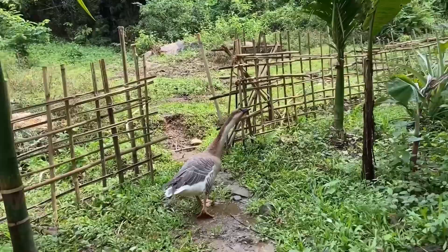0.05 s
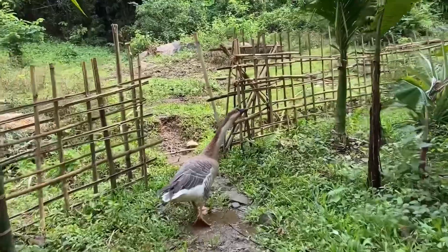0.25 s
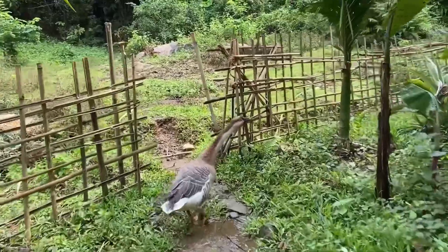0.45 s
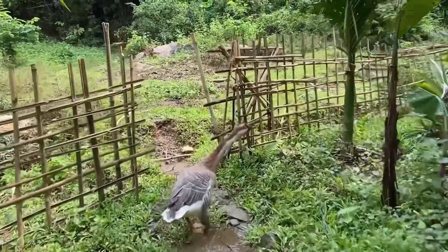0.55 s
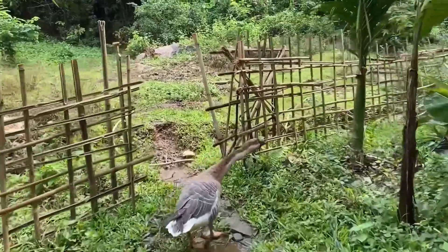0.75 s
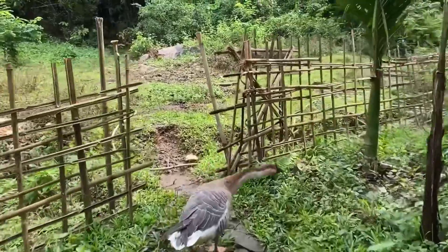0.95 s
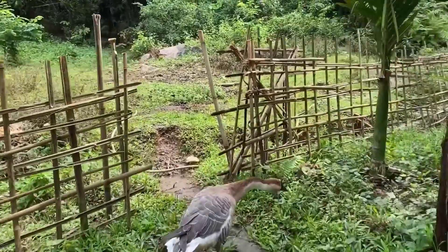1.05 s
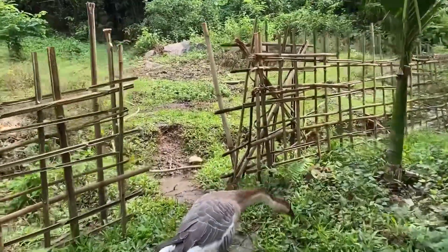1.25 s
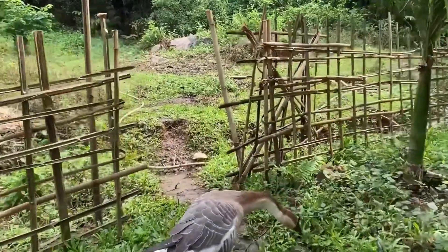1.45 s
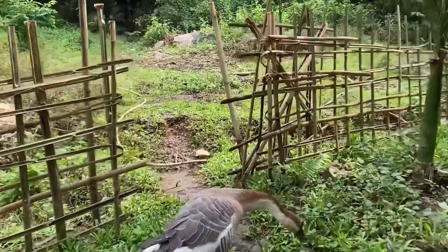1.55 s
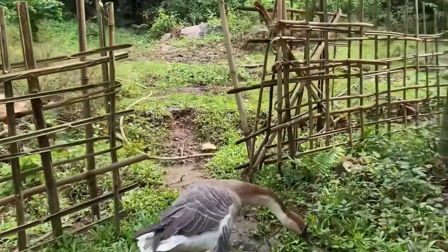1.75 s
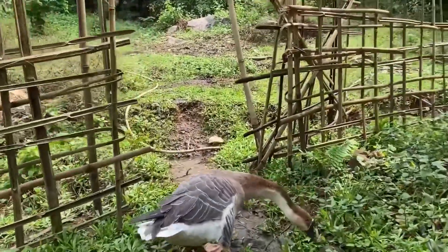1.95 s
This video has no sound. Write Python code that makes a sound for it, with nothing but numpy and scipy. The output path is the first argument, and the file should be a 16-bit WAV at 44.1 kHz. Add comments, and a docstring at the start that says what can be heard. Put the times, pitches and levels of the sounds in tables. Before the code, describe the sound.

On a garden path, a goose hisses once a little right of the microphone, growing louder and wheezing before cutting off with a tiny squeak. Light grass rustles follow against a low, quiet outdoor background.

```python
"""A goose gives one long hiss on a garden path, a few steps away and a little to the right.
Turbulent air excites the resonances of its throat, which rise as the neck stretches and now and
then catch as wheezy whistles; the upper resonances shift as the bill opens.
The hiss shuts off with a small falling squeak. Then grass rustles, once clearly and otherwise
faintly, over a quiet outdoor rumble."""
import sys
import numpy as np
from scipy import signal
from scipy.fft import rfft, irfft
from scipy.io import wavfile
from scipy.ndimage import uniform_filter1d

SR = 44100
rng = np.random.default_rng(int(sys.argv[2]) if len(sys.argv) > 2 else 0)


def unload_audio(sound):
    """Save the sound as a 16-bit wav file, at the path given as the first command line argument."""
    columns = np.transpose(np.atleast_2d(sound))
    # keep every value between -1 and 1, then stretch to whole-number steps
    steps = np.round(np.clip(columns, -1, 1) * 32767)
    wavfile.write(sys.argv[1], SR, steps.astype(np.int16))


N = 88200
T, HZ = np.arange(N) / SR, np.fft.rfftfreq(N, 1 / SR)
FLUTTER_HZ, WAVER_DEPTH_HZ, WAVER_RATE_HZ = 70, 8.16, 54  # unsteadiness of level and of pitch

# Breath through the throat resonances. Each row: time in seconds, level in dB.
THROAT_LEVEL = [(0, -49.5), (.1, -44.5), (.19, -36.5), (.3, -32), (.42, -33), (.52, -29), (.66, -29),
                (.85, -28), (.95, -21.5), (1.13, -23), (1.203, -26), (1.222, -30.5), (1.238, -27),
                (1.254, -52), (1.3, -52)]
# Breath through the upper resonances. Each row: time in seconds, level in dB.
BILL_LEVEL = [(0, -67), (.17, -50), (.24, -41.5), (.45, -38.5), (.6, -34), (.72, -32), (.88, -27.5),
              (1.03, -31.5), (1.2, -30.5), (1.222, -38), (1.245, -46), (1.26, -71), (1.3, -74)]
def goose():
    """Amplitude modulation: the hiss flutters with the airflow until the throat shuts."""
    breath = amp(curve(THROAT_LEVEL)) * throat() + amp(curve(BILL_LEVEL)) * bill() + air()
    flowing = T < THROAT_LEVEL[-1][0]
    flutter = amp(0.48 * wander(FLUTTER_HZ))
    return flowing * breath * flutter + whistles() + squeak()


# Stretch of the throat. Each row: time in seconds, frequency ratio.
STRETCH = [(0, .995), (.4, 1.004), (.6, 1.022), (.8, 1.014), (1.0, 1.11), (1.15, 1.208), (1.25, 1.12)]
# Throat resonances. Each row: rest frequency in Hz, nominal width in Hz, exponent of the stretch,
# relative level in dB at rest, the same when stretched.
THROAT_MODES = [(831, 77, 1.2, -7.5, -13.5), (1046.5, 124, .85, -2.5, 1.5), (1257, 108, .72, -4, 0.5),
                (1574, 92, 1.0, -0.5, -13), (1418, 150, 0.053, -1, -30), (519.8, 73, 0.63, -21.5, -28)]
def throat():
    """Source and filter: turbulence excites resonances that rise and trade strength with stretch."""
    stretch = curve(STRETCH)
    stretched = np.clip((stretch - 1) / 0.071, 0, 1)  # the balance stops changing at 7.1 % stretch
    out, power = 0, 0
    for hz, width, exponent, rest_db, stretched_db in THROAT_MODES:
        gain = amp(rest_db + (stretched_db - rest_db) * stretched)
        out += gain * band(hz * stretch ** exponent, width)
        power += gain ** 2
    return out / np.sqrt(power)


# Upper resonances. Each row: frequency in Hz with the bill nearly shut, the same wide open,
# nominal width in Hz, relative level in dB nearly shut, the same wide open.
BILL_MODES = [(1760, 2260, 184, 3.5, -1), (2200, 2600, 440, -4, -3), (2247, 3440, 165, -1, 4.5),
              (3170, 3650, 205, -0.5, -1), (3303, 4300, 270, 1.5, -13), (4020, 5750, 240, -15.5, -23),
              (4750, 4100, 220, -13, -42), (5550, 7100, 460, -17.5, -30)]
def bill(start_s=.2, opening_s=1.02):
    """Formant shift: opening the bill retunes the upper resonances, nearly all of them upward."""
    opened = np.clip((T - start_s) / opening_s, 0, 1) ** 1.45
    out, power = 0, 0
    for shut_hz, open_hz, width, shut_db, open_db in BILL_MODES:
        gain = amp(shut_db + (open_db - shut_db) * opened)
        out += gain * band(shut_hz + (open_hz - shut_hz) * opened, width)
        power += gain ** 2
    return out / np.sqrt(power)


# Spectrum of the air at the bill. Each row: frequency in Hz, relative density in dB.
AIR_SPECTRUM = [(300, -38), (700, -19), (1100, -12), (2000, 5.5), (3700, 2.5), (4400, -3), (5200, -3),
                (6600, -6.5), (8200, -9.5), (11000, -17.5), (16000, -25)]
def air(start_s=.18, end_s=1.26, rise_s=0.045, fall_s=0.049, growth_db_per_s=1.5):
    """Turbulent flow: air rushing past the open bill makes broadband noise."""
    gate = np.clip((T - start_s) / rise_s, 0, 1) * np.clip((end_s - T) / fall_s, 0, 1)
    level = amp(-41 + growth_db_per_s * (T - start_s))
    rush = colour(rng.standard_normal(N), AIR_SPECTRUM)
    return gate * level * unit(patchy(rush, depth_db=2.5))


# Whistles in the throat. Each row: start in seconds, length in seconds, first frequency in Hz,
# last frequency in Hz, level in dB.
WHISTLES = [(-.12, 0.33, 1015, 1076, -37), (-.08, 0.237, 3090, 3180, -56.5),
            (-.08, 0.15, 1600, 1580, -47.5), (0.217, 0.14, 1241, 1256, -33),
            (0.286, 0.2, 1260, 1283, -25.5), (0.336, 0.271, 810.4, 838.6, -29),
            (0.352, 0.19, 1538, 1587, -30.5), (0.376, 0.07, 3170, 3215, -41.5),
            (0.466, .26, 1065, 1096, -34), (0.578, 0.182, 832, 858, -37), (0.599, 0.12, 3190, 3304, -37.5),
            (0.707, 0.21, 1290, 1320, -27), (0.718, 0.16, 2590, 2625, -37), (0.922, .13, 1365, 1425, -26.5),
            (0.985, 0.175, 1712, 1752, -31), (1.075, 0.18, 1158, 1182, -29.5),
            (1.165, 0.059, 1410, 1306, -20), (1.228, 0.016, 1330, 1285, -31)]
def whistles():
    """Flow-excited oscillation: the throat catches on wavering, near-pure tones that swell and fade."""
    out = np.zeros(N)
    for start, length, from_hz, to_hz, db in WHISTLES:
        progress = np.clip((T - start) / length, 0, 1)
        hz = from_hz + (to_hz - from_hz) * progress + WAVER_DEPTH_HZ * wander(WAVER_RATE_HZ)
        swell = (4 * progress * (1 - progress)) ** 0.61
        level = amp(db + 1.25 * wander(FLUTTER_HZ)) * swell
        out += np.sqrt(2) * level * np.sin(2 * np.pi * np.cumsum(hz) / SR)
    return out


# Squeak as the throat closes. Each row: time in seconds, frequency in Hz, level in dB.
SQUEAK = [(1.04, 575, -51.5), (1.14, 560.3, -61), (1.175, 566.5, -42), (1.208, 585.5, -40),
          (1.255, 398, -45.5), (1.275, 392, -72)]
def squeak(grunt_db=-8.5):
    """Harmonic vibration: the falling squeak is the third harmonic of a weak grunt."""
    hz = curve(SQUEAK) + WAVER_DEPTH_HZ * wander(WAVER_RATE_HZ)
    phase = 2 * np.pi * np.cumsum(hz) / SR
    tone = np.sin(phase) + amp(grunt_db) * np.sin(phase / 3)
    sounding = (T > SQUEAK[0][0]) & (T < SQUEAK[-1][0])
    return np.sqrt(2) * sounding * amp(curve(SQUEAK, column=2)) * tone


# Brushes through grass. Each row: peak time, rise and decay in seconds, level in dB,
# centre and nominal width in Hz, crackle relative to the noise band in dB.
RUSTLES = [(1.849, 0.027, 0.02, -35.5, 2300, 910, -6), (1.42, 0.063, 0.042, -47, 1600, 3400, -7),
           (1.332, .03, 0.017, -45, 670, 240, -17), (1.98, 0.11, 0.054, -47.5, 900, 2000, -7)]
# Spectrum of the crackle. Each row: frequency in Hz, relative density in dB.
CRACKLE_SPECTRUM = [(500, -10), (2000, -3.5), (4000, -2), (6000, -6.5), (9000, -7.5), (12500, -0.5),
                    (16000, -13.5)]
def rustles(grains_per_s=3000, spread_db=2.5):
    """Shot noise: grass blades catch abruptly, adding random impulses to a soft band of noise."""
    out = np.zeros(N)
    for peak, rise, decay, db, hz, width, crackle_db in RUSTLES:
        attack = np.clip(1 + (T - peak) / rise, 0, 1) ** .3
        envelope = np.where(T < peak, attack, np.exp(-abs(T - peak) / decay))
        impulses = (rng.random(N) < grains_per_s / SR) * rng.choice([-1, 1], N)
        strengths = amp(spread_db * np.minimum(rng.exponential(1, N), 4))
        crackle = unit(colour(impulses * strengths, CRACKLE_SPECTRUM))
        out += amp(db) * envelope * (band(hz, width) + amp(crackle_db) * crackle)
    return out


# Echoes from fence and plants. Each row: frequency in Hz, level relative to the direct sound in dB.
ECHO_SPECTRUM = [(500, -12.5), (1300, -12), (2500, -8.5), (4000, -5), (5600, -6), (6800, -13.5),
                 (16000, -35)]
def garden(x, t60_s=0.11, echoes_per_s=2000):
    """Scattering: fence and plants return short, sparse echoes, different at each ear."""
    t = T[:SR // 4]
    taps = rng.standard_normal((2, len(t))) * (rng.random((2, len(t))) < echoes_per_s / SR)
    taps *= amp(-60 * t / t60_s) * (t > .003)
    taps /= np.linalg.norm(taps, axis=1, keepdims=True)
    return x + signal.fftconvolve(colour(x, ECHO_SPECTRUM)[None], taps, axes=1)[:, :N]


# Outdoor rumble and distant wash. Each row: frequency in Hz, relative density in dB.
WASH_SPECTRUM = [(20, -21), (35, -13), (58, -2), (85, -6.5), (115, -11.5), (150, -15), (250, -13),
                 (340, -18), (480, -19), (700, -18.5), (1200, -22.5), (2000, -23.5), (3500, -28.5),
                 (5800, -34), (8000, -34), (11000, -36.5), (15500, -42)]
# Likeness of the wash at the two ears. Each row: frequency in Hz, correlation from 0 to 1.
WASH_COHERENCE = [(60, 0.95), (200, 0.73), (500, 0.32), (1500, 0.05), (3000, 0.23), (4500, 0.66),
                  (5800, .4), (6600, 1), (16000, 1)]
# Distant drone. Each row: frequency in Hz, nominal width in Hz, level in dB.
DRONE = [(53.9, 6.6, -57), (193.2, 9.7, -53.5)]
def background(wash_db=-42, right_lead_db=0.5):
    """Partial coherence: the ears share part of a drifting rumble and all of a faint drone."""
    left, independent = rfft(rng.standard_normal((2, N)))
    coherence = spectrum(WASH_COHERENCE)
    right = coherence * left + np.sqrt(1 - coherence ** 2) * independent
    wash = irfft(np.array([left, right]) * amp(spectrum(WASH_SPECTRUM)), N)
    wash = amp(wash_db) * unit(patchy(wash, depth_db=1.57))
    drone = sum(amp(db) * band(hz, width) for hz, width, db in DRONE)
    return (wash + drone) * amp([[-right_lead_db / 2], [right_lead_db / 2]])


def amp(db):
    """Decibel scale: 20 dB is a factor of ten in amplitude."""
    return 10 ** (np.asarray(db) / 20)


def unit(x):
    """Normalisation to rms 1."""
    return x / np.sqrt(np.mean(x ** 2) + 1e-20)


def curve(points, column=1):
    """Linear interpolation of one table column over time."""
    rows = np.array(points)
    return np.interp(T, rows[:, 0], rows[:, column])


def spectrum(points):
    """Interpolation of a table over log frequency."""
    hz, value = np.transpose(points)
    return np.interp(np.log(HZ + 1), np.log(hz + 1), value)


def colour(x, points):
    """Zero-phase filtering by a table of gains in dB."""
    return irfft(rfft(x) * amp(spectrum(points)), N)


def wander(rate_hz):
    """Random fluctuation: low-passed noise of rms 1."""
    return unit(irfft(rfft(rng.standard_normal(N)) / (1 + (HZ / rate_hz) ** 4), N))


def band(hz, width_hz):
    """Heterodyning: low-passed noise on a carrier acts as a steep, movable resonance, at rms 1."""
    pole = np.exp(-np.pi * width_hz / SR)
    noise = rng.standard_normal((2, N + SR // 4))
    envelope = signal.lfilter([1], [1, -2 * pole, pole * pole], noise[0] + 1j * noise[1])[-N:]
    carrier = np.exp(2j * np.pi * np.cumsum(hz * np.ones(N)) / SR)
    return unit((envelope * carrier).real)


def patchy(x, depth_db):
    """Random modulation: the level drifts in small patches of time and frequency."""
    frames = signal.stft(x, nperseg=1024)[2]
    patches = uniform_filter1d(rng.standard_normal(frames.shape[-2:]), size=7, axis=0)
    patches = unit(uniform_filter1d(patches, size=6, axis=1))
    return signal.istft(frames * amp(depth_db * patches), nperseg=1024)[1][..., :N]


# Direction of goose and grass. Each row: frequency in Hz, left minus right level in dB.
LEVEL_DIFFERENCE = [(500, -4.5), (820, -6.5), (1100, -5), (1350, -3.5), (1650, -4), (2400, -1.9),
                    (3500, 0.5), (4400, 0.5), (5200, 10.5), (6100, 5), (7000, -1), (16000, 1)]
def scene():
    """Interaural level difference: goose and grass stand a little to the right, over the background."""
    near = garden(goose() + rustles())
    ear_gains = amp(np.outer([.5, -.5], spectrum(LEVEL_DIFFERENCE)))
    return irfft(rfft(near) * ear_gains, N) + background()


# Phase between the two microphone ports. Each row: frequency in Hz, lead of the right in half turns.
PORT_PHASE = [(0, 0), (7400, 0), (8500, 1), (9500, 1), (10400, 2), (11600, 2), (12600, 3), (13700, 3),
              (14500, 4)]
def record(dry, cutoff_hz=15800):
    """Phase shift and band limit: the right channel leads in the high treble; both are low-passed."""
    turn = np.exp(1j * np.pi * np.interp(HZ, *np.transpose(PORT_PHASE)))
    pair = np.array([dry[0], irfft(rfft(dry[1]) * turn, N)])
    lowpass = signal.firwin(511, cutoff_hz, window=("kaiser", 9), fs=SR)
    return signal.oaconvolve(pair, lowpass[None], "same")


dry = scene()
out = record(dry)
unload_audio(out)
```